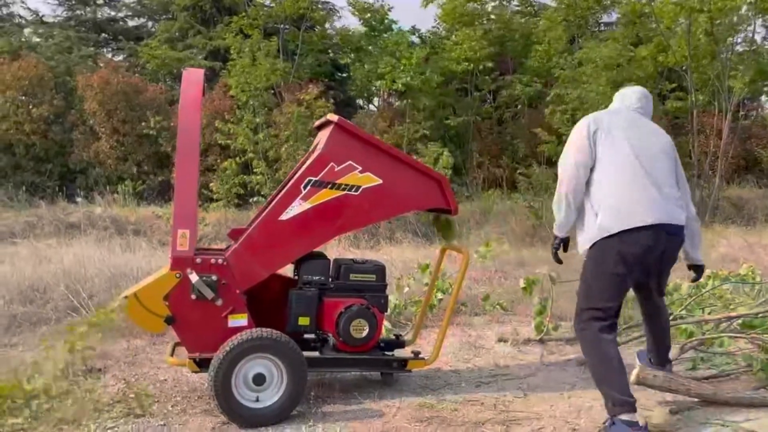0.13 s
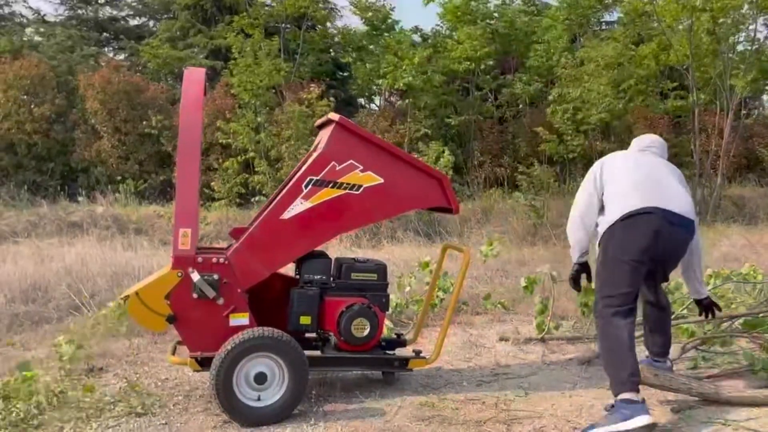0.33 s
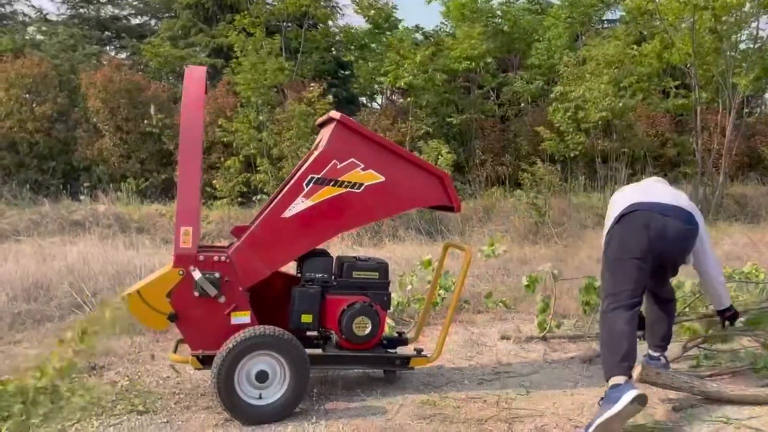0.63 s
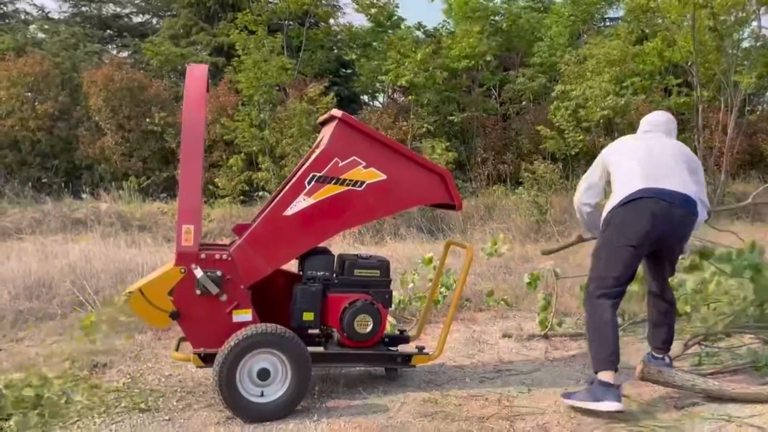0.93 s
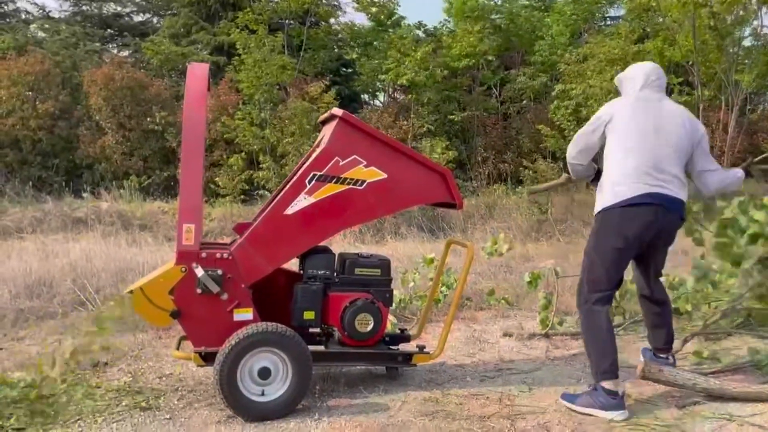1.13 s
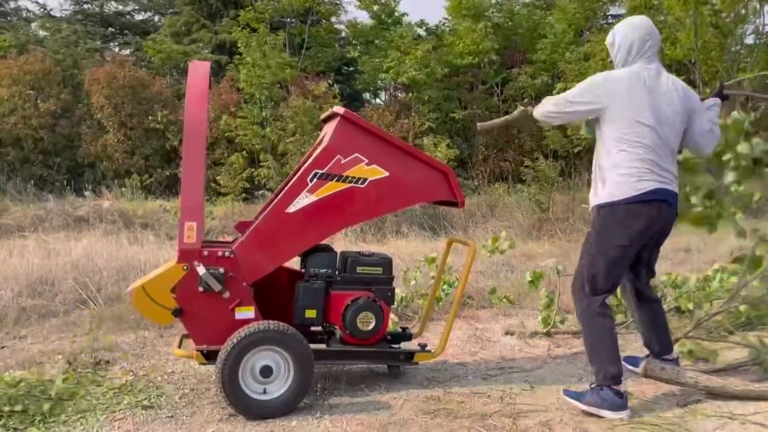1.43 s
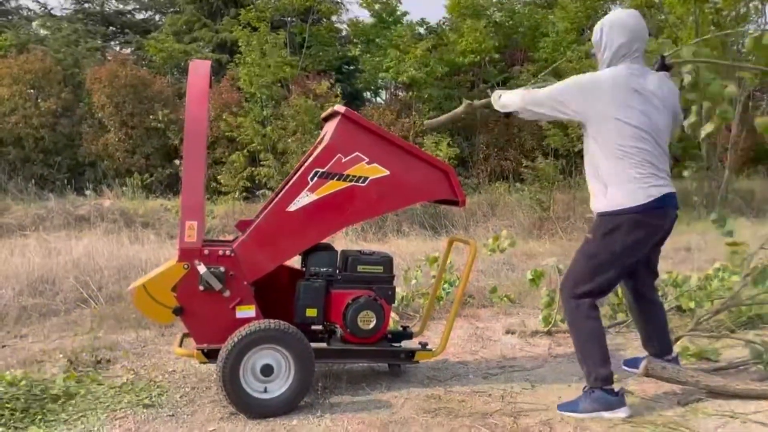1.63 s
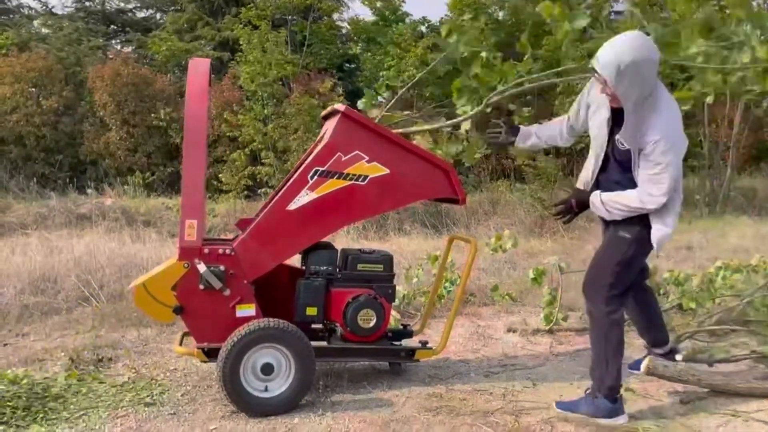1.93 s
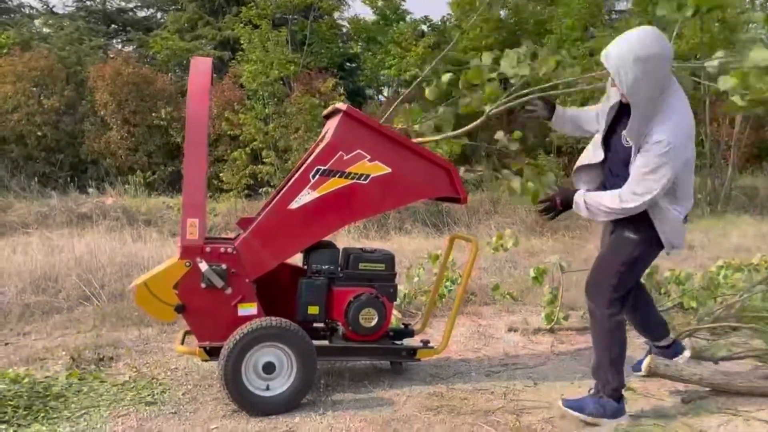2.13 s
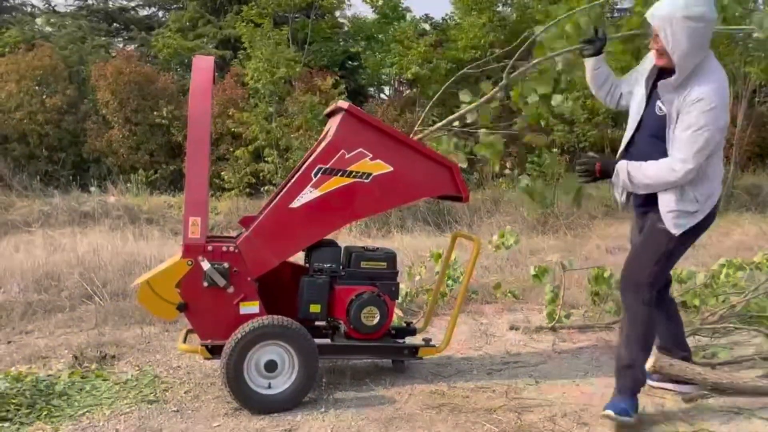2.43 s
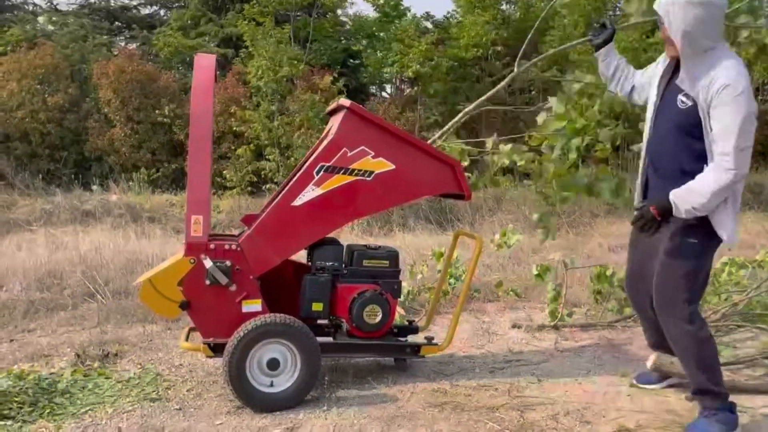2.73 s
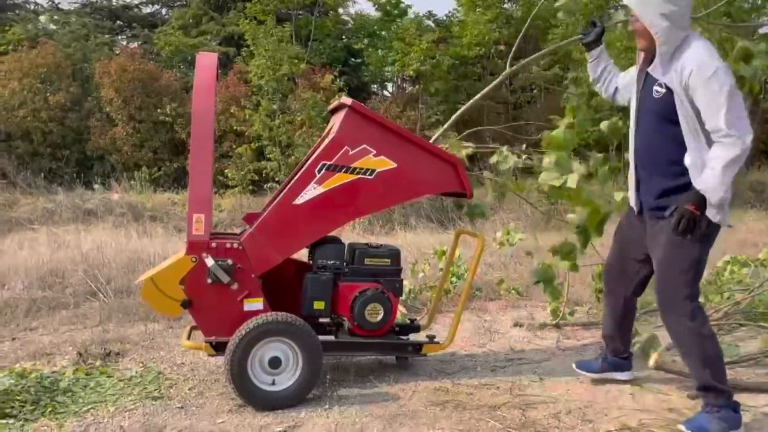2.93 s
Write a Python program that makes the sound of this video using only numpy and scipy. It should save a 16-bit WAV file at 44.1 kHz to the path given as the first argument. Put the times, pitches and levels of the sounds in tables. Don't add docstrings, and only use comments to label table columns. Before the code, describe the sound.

A petrol wood chipper roars outdoors, finishing leafy twigs, running empty, then taking a knocking branch.

```python
import sys
import numpy as np
from scipy import signal
from scipy.fft import rfft, irfft
from scipy.io import wavfile
from scipy.ndimage import uniform_filter1d

SR = 44100
rng = np.random.default_rng(int(sys.argv[2]) if len(sys.argv) > 2 else 0)


def to_wav(sig):
    pcm = np.clip(np.atleast_2d(sig), -1, 1) * 32767
    pcm = np.round(pcm).astype(np.int16)
    wavfile.write(sys.argv[1], SR, pcm.T)


def voltage_ratio(level):
    return 10 ** (np.asarray(level, float) / 20)


N = 135828

# (time [s], engine firings [1/s], knife passes [1/s])
SPEED = [(0, 30.8, 80.9), (.8, 31, 81.9), (1.25, 31.25, 82.3), (1.6, 31.1, 82.0), (1.9, 30.9, 82.2),
         (2.4, 31.3, 82.3), (3.08, 31.35, 82.35)]
# (time [s], machine level [dB], exhaust boom [dB], hopper mouth covered [-1..1])
EFFORT = [(0, -28, -1, -0.43), (.3, -31, 1.5, -0.56), (.55, -30.5, -1.5, -0.29), (.8, -31.5, 3.5, -0.62),
          (1.1, -33, 5.5, -0.4), (1.28, -33.5, 0.5, -0.98), (1.4, -33, -1, 0.43), (1.55, -33, 2, -0.2),
          (1.75, -31, -3.5, 0.54), (1.87, -29, 2.5, 0.67), (2.0, -31, -7, 0.03), (2.2, -31, 2, 0.4),
          (2.4, -31, -3.5, 0.031), (2.52, -31, -3, 0.023), (2.65, -30, 7.5, 0.41), (2.85, -30, -7.5, 0.34),
          (3.08, -31, 10, 0.86)]
# (multiple of firing rate [-], level [dB])
EXHAUST = [(1, -57.5), (2, -35), (3, -43), (4, -31), (5, -34), (6, -45.5), (7, -48.5), (9, -58), (10, -49),
           (11, -43.5), (12, -40), (14, -44.5), (15, -45)]
# (multiple of knife rate [-], level [dB], change when mouth is covered [dB])
KNIVES = [(1, -42, -1), (2, -35, -1.5), (3, -32.5, 8.5), (4, -38.5, -3), (5, -31.5, -3), (6, -35, 3),
          (7, -39, 7), (8, -46.5, 9), (9, -53, 17), (10, -42, 2), (11, -43.5, 0), (12, -54, 0),
          (14, -69, -9), (16, -45.5, 4)]
# (time [s], level [dB])
THROAT = [(0, -2.5), (1.15, 1.5), (1.3, 0), (1.4, 2.5), (1.5, -1), (1.6, 5), (1.72, -2), (1.95, -5),
          (2.2, 1), (2.5, 1.5), (2.8, 0), (3.08, -2)]
# (time [s], level [dB])
WHISTLE = [(0, -2), (.3, 0), (.55, -0.5), (.75, 1), (1.0, 0), (1.25, 2), (1.38, -7.5), (1.5, -1.5),
           (1.65, 1), (1.85, -4), (1.98, 4.5), (2.2, -1.5), (2.45, 1.5), (2.58, -4.5), (2.8, 0.5),
           (2.95, -0.5), (3.08, -2.5)]
# (time [s], level [dB])
CHUTE_HUM = [(0, -39), (.18, -46), (.26, -31.5), (.6, -37.5), (.75, -29.5), (.9, -40), (1.15, -29),
             (1.23, -47), (3.08, -63)]
# (frequency [Hz], density [dB per Hz])
ROAR_LOW_BAND = [(25, -36), (45, 2), (80, 2), (150, -3), (210, -1), (400, -2), (600, -8.5), (900, -6.5)]
ROAR_HIGH_BAND = [(530, -30), (900, -0.5), (1680, -9), (2000, -6), (2470, -13), (5250, -16), (8060, -24),
                  (8740, -31.5), (14400, -34.5)]
# (frequency [Hz], width [Hz], level [dB])
HOUSING = [(156, 50, 5), (1302, 460, 6), (1760, 190, -1.5), (2110, 940, 4.5), (5200, 430, 2)]
# (time [s], level [dB])
LEAF_FLOW = [(0, -30), (.08, -27), (.19, -29.5), (.25, -27), (.33, -30), (.45, -28.5), (.54, -31),
             (.62, -30), (.77, -34.5), (.83, -39.5), (.92, -33.5), (.97, -37.5), (1.01, -35.5),
             (1.06, -37.5), (1.12, -41), (1.25, -46), (1.45, -56)]
# (frequency [Hz], density [dB per Hz])
SPRAY = [(700, -3), (1400, -5), (2500, -10), (3500, -12), (5300, -3), (6800, -6.5), (9000, -11.5),
         (14000, -24)]
# (time [s], level [dB])
CRACKS = [
    (0.1336, -11),
    (0.2374, -13),
    (0.4194, -20),
    (0.4449, -16),
    (0.5594, -24),
    (0.7382, -17),
    (0.8844, -27),
    (0.9014, -27),
    (0.9694, -27),
    (1.0594, -19),
]
# (frequency [Hz], level [dB], t60 [s])
PANELS = [(800, -10, .2), (1040, -8, .3), (1297, -2, .6), (1459, -4, .8), (1832, -9, .5), (2000, -11, .3),
          (5280, -9, .02)]
# (time [s], level [dB])
KNOCKS = [(0.761, -37), (0.999, -15), (1.809, -19), (1.848, -16), (1.886, -14), (1.92, -37), (1.965, -14),
          (2.019, -51), (2.059, -20), (2.131, -19), (2.222, -26), (2.271, -16.5), (2.58, -15.5),
          (2.681, -26), (2.818, -26), (2.895, -27)]
# (frequency [Hz], level [dB], t60 [s])
HOPPER_MODES = [(93, -7, 0.1), (141, -12.5, 0.15), (163, -0.5, 0.083), (330, -22, 0.04), (487, -10, 0.27),
                (856, -9, 0.12), (1374, -16, .05), (2060, -8, 0.045)]
# (time [s], pitch [Hz], level [dB])
BOOM = [
    (1.76, 136.3, -41),
    (1.84, 140, -32),
    (1.9, 142.2, -24),
    (1.97, 148.8, -23.5),
    (2.03, 167.5, -29.5),
    (2.12, 171.1, -36),
    (2.2, 157.4, -37),
    (2.27, 152.3, -26.5),
    (2.4, 156, -36),
]
# (frequency [Hz], level [dB], t60 [s])
GRIT_MODES = [(3200, 4, 0.0099), (5290, 4.0, 0.019), (9000, -10.0, 0.012), (11100, -7, 0.004)]
# (frequency [Hz], share of time [0..1])
DROPOUTS = [(2500, 0), (3200, .02), (6700, .025), (7100, .14), (7300, .06), (7700, .14), (8010, .68),
            (8185, .88), (8350, .02), (13500, .03), (14150, .25), (14450, .7)]
# (time [s], frequency [Hz], length [s])
STRIPS = [(.33, 15680, .04), (.45, 15620, .08), (.56, 15630, .04), (.67, 15450, .04), (.74, 15550, .05),
          (.96, 15680, .03), (1.08, 15550, .06), (1.29, 15650, .02), (1.44, 15680, .04), (1.53, 15550, .06),
          (1.68, 15620, .07), (2.07, 15570, .05), (2.26, 15570, .02), (2.75, 15400, .05),
          (2.82, 15520, .03), (2.89, 15500, .06), (2.99, 15520, .04), (3.06, 15500, .04)]

ROAR_DB, ROAR_JOIN_DB, CHUTE_ORDER = 4, -7, 12
SPRAY_DB, SNAP_DB, CRACK_DB = 1.5, -16, -0.5
SHRED_HZ, SHRED_WIDTH_HZ, SHRED_DB = 5260, 500, 4
PANEL_DB, PANEL_WAKE_S = -5.5, 0.15
TICK_DB, TICKS_PER_S = -53, 160
NOTCH_HZ, NOTCH_WIDTH_HZ, NOTCH_DB, EDGE_HZ = 8100, 200, -9, 14500
STRIP_WIDTH_HZ, STRIP_DB = 260, -76

TIME_S = np.arange(N) / SR
FREQ_HZ = np.fft.rfftfreq(N, 1 / SR)


def evened(x):
    return x / np.sqrt(np.mean(x ** 2) + 1e-20)


def curve(table, column=1):
    rows = np.array(table)
    return np.interp(TIME_S, rows[:, 0], rows[:, column])


def read(points, hz):
    f, value = np.transpose(points)
    return np.interp(np.log(hz + 1), np.log(f + 1), value)


def peak(hz, centre_hz, width_hz, db):
    return db / (1 + (2 * (hz - centre_hz) / width_hz) ** 2)


def drift(top_hz):
    z = rfft(rng.standard_normal(N))
    return evened(irfft(z * (FREQ_HZ > 0) * np.exp(-(FREQ_HZ / top_hz) ** 2), N))


def colour(x, db):
    return irfft(rfft(x) * voltage_ratio(db), N)


def smooth(x, frames, time_frames):
    return evened(uniform_filter1d(uniform_filter1d(x, size=frames, axis=0), size=time_frames, axis=1))


def patchy(patch_db, streak_db):
    real, imag, patch, streak = rng.standard_normal((N // 256 + 5, 513, 4)).T
    patch = smooth(patch, 14, 4)
    streak = smooth(streak, 2, 16)
    gaps = 0.9 * np.maximum(-streak - 0.7, 0)
    db = patch_db * patch + streak_db * (streak - gaps)
    noise = signal.istft((real + 1j * imag) * voltage_ratio(db), nperseg=1024, noverlap=768)[1]
    return evened(noise[:N])


def ring(x, modes):
    t = np.arange(SR // 2) / SR
    response = sum(voltage_ratio(db - 60 * t / t60) * np.sin(2 * np.pi * hz * t) for hz, db, t60 in modes)
    return signal.oaconvolve(x, response)[:N]


def orders(turns, table, control, waver_db, waver_hz, slip_rad, spread):
    total = np.zeros(N)
    for multiple, db, share in table:
        level = voltage_ratio(db + share * control + waver_db * drift(waver_hz))
        phase = 2 * np.pi * (multiple * turns + spread * rng.random()) + slip_rad * drift(waver_hz)
        total += np.sqrt(2) * level * np.cos(phase)
    return total


def housing_roar(fire, knife):
    low = read(ROAR_LOW_BAND, FREQ_HZ)
    high = read(ROAR_HIGH_BAND, FREQ_HZ) + ROAR_JOIN_DB
    db = np.where(FREQ_HZ < 900, low, high)
    db = db + sum(peak(FREQ_HZ, f, width, level) for f, width, level in HOUSING)
    puffs = 1 + 0.4 * np.exp(-(knife % 1) / 0.2) + 0.35 * np.exp(-(fire % 1) / 0.15)
    roar = evened(colour(patchy(patch_db=0.5, streak_db=1.5) * puffs, db))
    return roar * voltage_ratio(ROAR_DB + 0.13 * drift(14.0))


def rotation_tones(fire, knife):
    beats = [(k, db, np.exp(-((k - 4) / 0.43) ** 2)) for k, db in EXHAUST]
    covered = curve(EFFORT, 3)
    exhaust = orders(fire, beats, curve(EFFORT, 2), waver_db=0.6, waver_hz=5.9, slip_rad=0.32, spread=0.98)
    lower = orders(knife, KNIVES[:4], covered, waver_db=0.55, waver_hz=3.8, slip_rad=0.26, spread=0.98)
    upper = orders(knife, KNIVES[4:], covered, waver_db=1.1, waver_hz=5.5, slip_rad=0.13, spread=0.31)
    hum = orders(fire, [(CHUTE_ORDER, 0, 1)], curve(CHUTE_HUM),
                 waver_db=0.3, waver_hz=12, slip_rad=0.34, spread=0.91)
    return exhaust + voltage_ratio(curve(THROAT)) * lower + voltage_ratio(curve(WHISTLE)) * upper + hum


def machine():
    fire = np.cumsum(curve(SPEED) * (1 + 0.002 * drift(7.1))) / SR
    knife = np.cumsum(curve(SPEED, 2)) / SR
    level_db = curve(EFFORT)
    mean_db = level_db.mean()
    swing_db = level_db - mean_db
    roar = housing_roar(fire, knife) * voltage_ratio(mean_db + 0.84 * swing_db)
    return roar + rotation_tones(fire, knife) * voltage_ratio(0.59 * swing_db), knife


def impulses(per_s, spread_db, most):
    level = voltage_ratio(spread_db * np.minimum(rng.exponential(1, N), most))
    return rng.choice([-1, 1], N) * level * (rng.random(N) < per_s / SR)


def shred_grains():
    t = np.arange(256) / SR
    shreds = np.zeros(N)
    for grain_hz in np.linspace(700, 14200, 28):
        train = voltage_ratio(1.4 * rng.exponential(1, N)) * (rng.random(N) < 300 / SR)
        grain = np.sin(2 * np.pi * grain_hz * t) * t * np.exp(-t / 0.00056)
        shreds += signal.oaconvolve(train, grain)[:N]
    return evened(shreds)


def twig_cracks():
    t = np.arange(256) / SR
    cracks = np.zeros(N)
    for start_s, db in CRACKS:
        burst = rng.standard_normal(256) * np.exp(-t / 0.0024)
        cracks[round(start_s * SR):][:256] = voltage_ratio(db + CRACK_DB) * burst
    return colour(cracks, read(SPRAY, FREQ_HZ))


def leaves(knife):
    flow = voltage_ratio(curve(LEAF_FLOW)) * np.clip((LEAF_FLOW[-1][0] - TIME_S) / 0.28, 0, 1)
    cut = (1 + 0.14 * np.exp(-(knife % 1) / 0.35)) * voltage_ratio(0.5 * (drift(23) - drift(25)))
    snaps = voltage_ratio(SNAP_DB) * evened(impulses(200, spread_db=3.2, most=4))
    mix = (0.4 * shred_grains() + patchy(patch_db=1.4, streak_db=3.2)) * cut + snaps
    spray_db = read(SPRAY, FREQ_HZ) + peak(FREQ_HZ, SHRED_HZ, SHRED_WIDTH_HZ, SHRED_DB)
    spray = voltage_ratio(SPRAY_DB) * evened(colour(mix, spray_db))
    chips = rng.standard_normal(N) * cut * np.clip(TIME_S / PANEL_WAKE_S, 0.3, 1)
    panels = voltage_ratio(PANEL_DB) / np.std(ring(chips, PANELS)) * ring(chips * flow, PANELS)
    return spray * flow + twig_cracks() + panels


def branch():
    blows = np.zeros(N)
    for start_s, db in KNOCKS:
        blows[round(start_s * SR)] = voltage_ratio(db)
    t = np.arange(200) / SR
    push = t * np.exp(-t / 0.00022)
    return ring(signal.oaconvolve(blows, push / push.sum())[:N], HOPPER_MODES)


def boom():
    rise = np.clip((TIME_S - BOOM[0][0]) / 0.034, 0, 1)
    fall = np.clip((BOOM[-1][0] - TIME_S) / 0.082, 0, 1)
    phase = 2 * np.pi * np.cumsum(curve(BOOM)) / SR + 0.28 * drift(12)
    return np.sqrt(2) * rise * fall * voltage_ratio(curve(BOOM, 2)) * np.cos(phase)


def ticks():
    train = impulses(TICKS_PER_S, spread_db=4.4, most=4)
    return voltage_ratio(TICK_DB) * evened(ring(train, GRIT_MODES))


def thinned(x):
    hz, _, z = signal.stft(x, SR, nperseg=1024, noverlap=768)
    power = (abs(z[:512]) ** 2).reshape(128, 4, -1).mean(1)
    luck = evened(uniform_filter1d(rng.standard_normal(power.shape), size=10, axis=1))
    now = uniform_filter1d(power, size=6, axis=1)
    usual = uniform_filter1d(power, size=60, axis=1) + 1e-20
    score = 3.1 * np.log10(now / usual ** 0.48 + 1e-20) + 5.8 * uniform_filter1d(luck, size=2, axis=0)
    rank = score.argsort(1).argsort(1) / score.shape[1]
    keep = np.repeat(rank >= read(DROPOUTS, hz[2:512:4])[:, None], 4, 0)
    keep = np.vstack([keep, keep[-1:]])
    return signal.istft(z * keep, SR, nperseg=1024, noverlap=768)[1][:N]


def strips():
    out = np.zeros(N)
    hiss_db = np.clip(np.where(TIME_S < 1.3, curve(LEAF_FLOW), -50), -44, 0)
    for centre_s, hz, length_s in STRIPS:
        t = np.arange(round((length_s + 0.02) * SR)) / SR
        band = np.zeros(len(t))
        for offset, phase in rng.random((8, 2)):
            band += np.cos(2 * np.pi * ((hz + STRIP_WIDTH_HZ * (offset - 0.5)) * t + phase))
        part = out[round((centre_s - t[-1] / 2) * SR):][:len(t)]
        part += (band * signal.windows.tukey(len(t), 0.6) / 2)[:len(part)]
    return out * voltage_ratio(STRIP_DB + 0.86 * (hiss_db + 44))


def scene():
    sound, knife = machine()
    return (sound + leaves(knife) + branch() + boom() + ticks())[None]


def low_pass(x):
    return signal.sosfilt(signal.butter(12, 15620, fs=SR, output="sos"), x)


def record(dry):
    hz = FREQ_HZ
    db = NOTCH_DB * np.exp(-((hz - NOTCH_HZ) / NOTCH_WIDTH_HZ) ** 2)
    db = db - 7 * np.exp(-((hz - 7500) / 500) ** 2)
    db = db - 20 * np.log10(1 + (35 / (hz + 1)) ** 2)
    db = db - 80 * (hz > EDGE_HZ) - 9.4 * np.clip((hz - 13800) / 700, 0, 1)
    mix = thinned(colour(dry[0], db)) + strips()
    return low_pass(mix[None])


dry = scene()
out = record(dry)
to_wav(out)
```